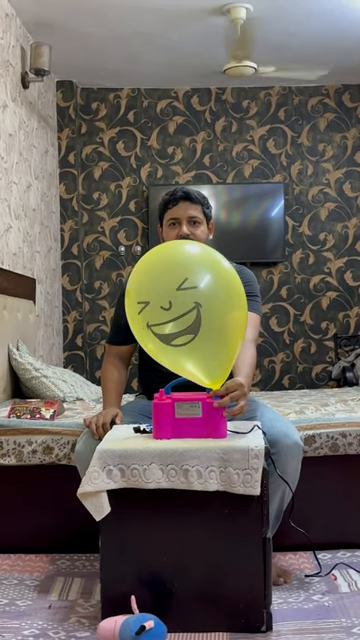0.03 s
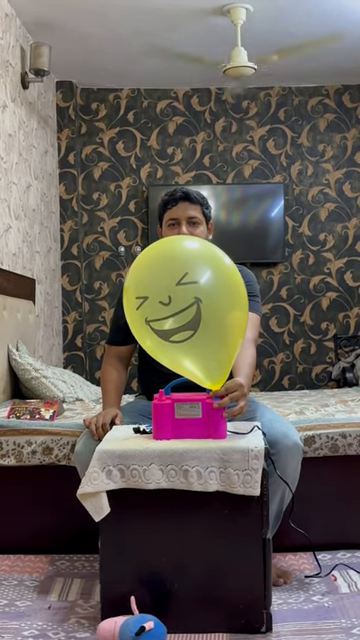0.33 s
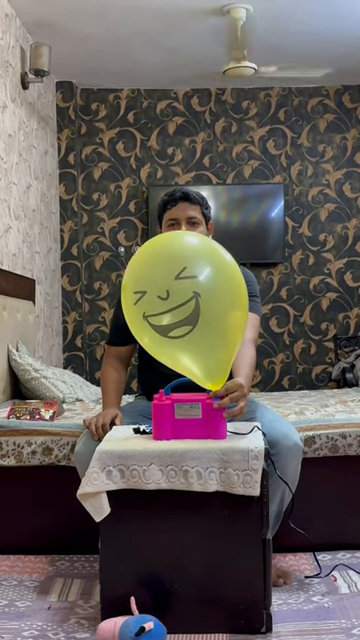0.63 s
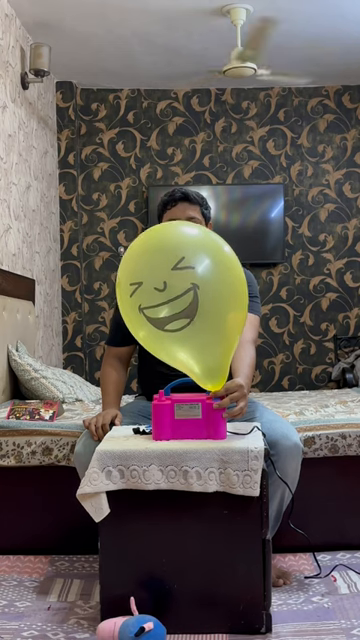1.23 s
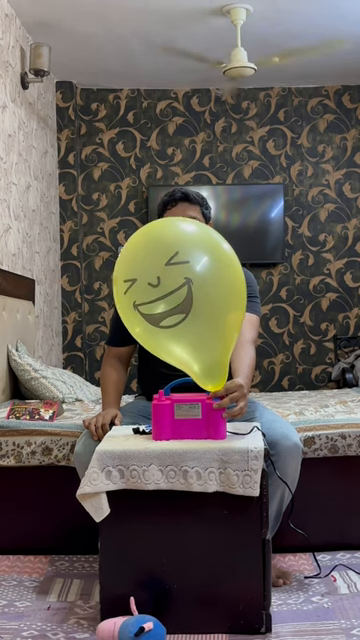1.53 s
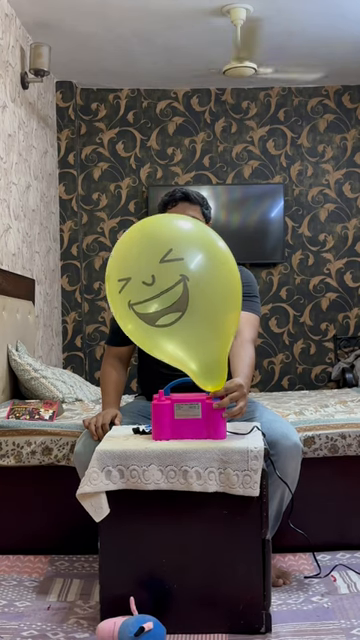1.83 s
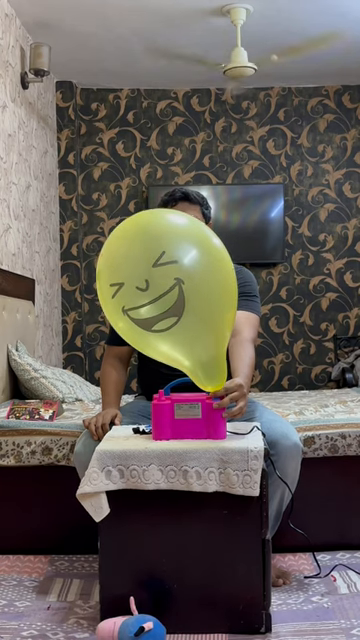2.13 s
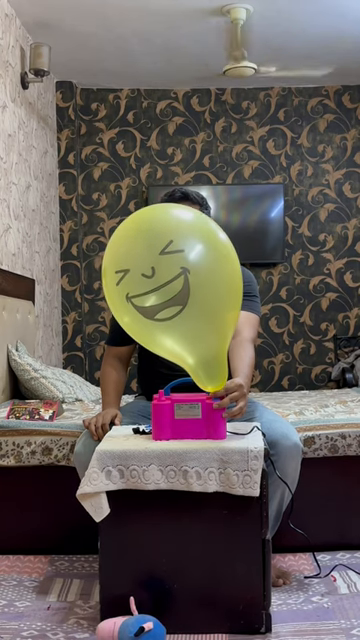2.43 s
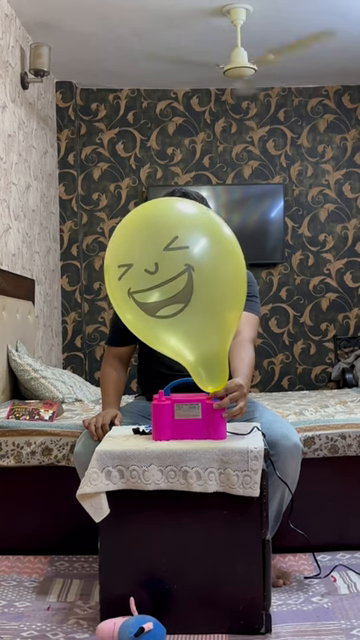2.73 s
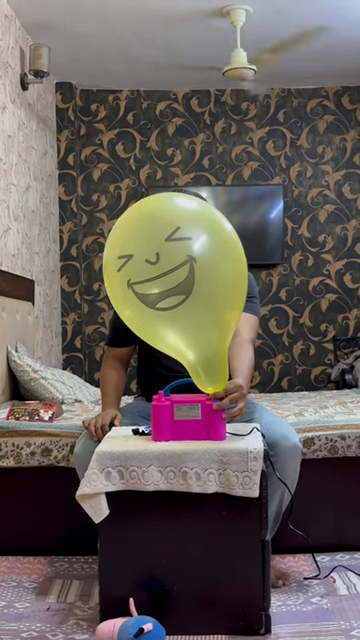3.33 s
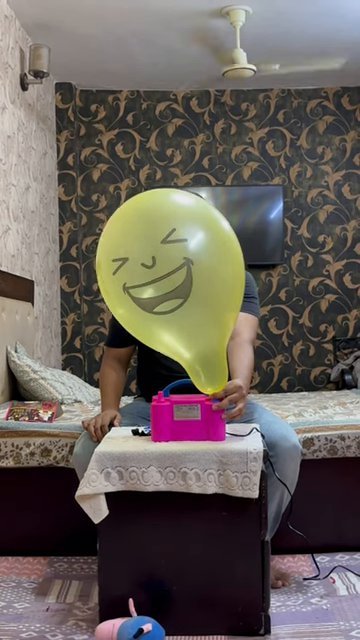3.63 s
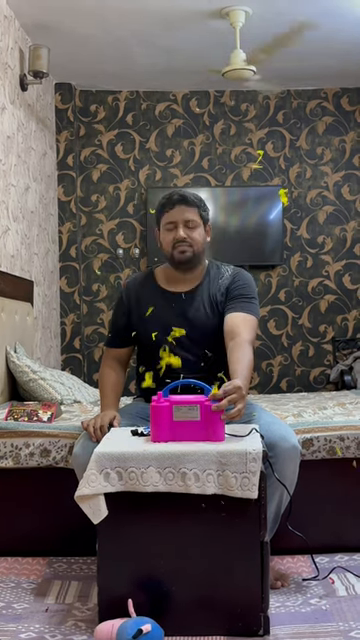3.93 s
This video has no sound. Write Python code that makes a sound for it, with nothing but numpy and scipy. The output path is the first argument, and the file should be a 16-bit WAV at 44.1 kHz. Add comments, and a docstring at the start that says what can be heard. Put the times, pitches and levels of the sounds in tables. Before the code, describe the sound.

An electric balloon pump runs from the start with a steady motor whine, a hiss of air and a thin, high whistle that keeps swelling and fading. At about 3.8 seconds the balloon bursts with one sharp bang, far louder than the pump. The small room booms briefly, and the pump carries on underneath, much quieter after the bang.

```python
"""In a small furnished room, an electric balloon pump runs on a table: its motor whines,
air rushes through it and the nozzle gives a wavering whistle. Near the end the overfilled
balloon rips and bursts. The walls throw the bang back and the room booms. The phone's
limiter, an automatic volume control, turns the pump down along with the bang."""
import sys
import numpy as np
from scipy import signal
from scipy.fft import rfft, irfft
from scipy.io import wavfile
from scipy.ndimage import uniform_filter1d, minimum_filter1d

SR = 44100
rng = np.random.default_rng(int(sys.argv[2]) if len(sys.argv) > 2 else 0)


def materialize(psi):
    """Save the field psi as 16-bit PCM at rate SR to the path in sys.argv[1].

    A 1-D psi becomes a single channel; in a 2-D psi each row is a channel.
    """
    bounded = np.clip(np.atleast_2d(psi).T, -1, 1)
    quanta = np.round(bounded * 32767).astype(np.int16)
    wavfile.write(sys.argv[1], SR, quanta)


N = 176400

BURST_S = 3.7852
# Left-right differences of the sound. From 10.6 to 13.3 kHz the sides are set opposite,
# so that treble vanishes from the centre.
# Columns: pitch_hz, left_lead_rad, left_minus_right_db, likeness (0 to 1)
SIDE_DIFFERENCES = [(100, 0, .8, .99), (250, 0, 3.5, .95), (480, 0, 6, .72), (750, -.6, 4, .66),
                    (1200, -.15, 0, .75), (1700, 0, 0, .98), (5400, 0, 0, .98), (6100, -.65, 0, .88),
                    (8000, -1.6, 0, .75), (9800, -2.5, 0, .8), (10600, -3.13, 0, .999),
                    (13300, -3.15, 0, .999), (14300, -3.4, 0, .75), (15500, -4.3, 0, .75)]


def burst(t):
    """The rubber parts with two cracks and snaps; the freed air thumps and rings, falling in pitch."""
    # The rubber giving way. Columns: start_s, crack_db, snap_db
    breaks = [(3.7851, 9.5, 5), (3.787, -3, 1.5)]
    crack_s, snap_fade_s = 0.00049, 0.0011
    cracks = 0
    for start, crack_db, snap_db in breaks:
        age = np.maximum(t - start, 0)
        crack = undb(crack_db) * (1 - 2 * age / crack_s) * (age < crack_s)  # shaped like the letter N
        snap = undb(snap_db) * np.exp(-age / snap_fade_s) * rng.standard_normal(N)
        cracks = cracks + (t >= start) * (crack + snap)
    age = np.maximum(t - BURST_S, 0)
    start_hz, end_hz, glide_s, ring_s = 1760, 463, 0.00076, 0.0059
    cycles = end_hz * age + (start_hz - end_hz) * glide_s * (1 - np.exp(-age / glide_s))
    ring = -undb(8) * np.sin(2 * np.pi * cycles) / (1 + (age / ring_s) ** 6)
    thump = undb(0.5) * air_push(age, fade_s=0.0018)
    return irfft(to_sides(rfft(cracks + ring + thump)), N)


def rip(t):
    """A split races through the rubber, which flaps and hisses just before the bang."""
    # Tones of the flapping rubber. Columns: pitch_hz, peak_db
    flap_tones = [(570, -15.5), (310, -21)]
    peak_s, rise_s, fade_s = 3.7763, 0.003, 0.004
    age = t - peak_s
    from_peak = np.where(age < 0, age / rise_s, age / fade_s)
    swell = 1 / np.cosh(np.clip(from_peak, -50, 50)) ** 2
    flap = sum(undb(db) * np.cos(2 * np.pi * hz * age) for hz, db in flap_tones)
    treble_cut = signal.butter(6, 7500, fs=SR, output="sos")
    hiss = unit(signal.sosfilt(treble_cut, rng.standard_normal(N)))
    return swell * (pan(13) * flap + undb(-23) * hiss)


def nozzle_whistle(t):
    """Air whistles in the nozzle on a nearly steady pitch, and weakens as the balloon gives way."""
    # How the whistle swells and fades. Columns: time_s, level_db
    swells = [(0.0, -27), (0.08, -39), (0.2, -31), (0.265, -39.5), (0.345, -26.5), (0.41, -34),
              (0.5, -25.5), (0.71, -31.5), (0.732, -46), (0.765, -33), (0.8, -29), (0.835, -35),
              (0.88, -29.5), (0.98, -35.5), (1.14, -26.5), (1.18, -30), (1.24, -42), (1.34, -33),
              (1.43, -26.5), (1.49, -33), (1.52, -67), (1.565, -32), (1.61, -42), (1.67, -29.5),
              (1.77, -33.5), (1.81, -27.5), (1.85, -25.5), (1.92, -38.5), (2.0, -26.5), (2.15, -33),
              (2.18, -36.5), (2.23, -31), (2.3, -26), (2.34, -29), (2.38, -39.5), (2.47, -27),
              (2.62, -38.5), (2.68, -30.5), (2.74, -34.5), (2.79, -29.5), (2.85, -38), (2.89, -38),
              (2.91, -34.5), (3.01, -28), (3.09, -34), (3.13, -30), (3.21, -33), (3.245, -44), (3.29, -34),
              (3.44, -39.5), (3.57, -29.5), (3.61, -28.5), (3.64, -39), (3.72, -40), (3.75, -27.5),
              (3.77, -34)]
    pitch_hz, rise_hz_per_s, wander_hz, jitter_hz = 5091.5, 2, 3.42, 3.47
    drop_at_s, drop_takes_s, drop_db = 3.764, 0.006, 8
    hz = pitch_hz + rise_hz_per_s * t + wander_hz * wobble(40.1) + jitter_hz * wobble(300)
    db = np.interp(t, *np.array(swells).T) + 0.4 + 0.43 * wobble(90)
    db = db - drop_db * np.clip((t - drop_at_s) / drop_takes_s, 0, 1)
    return np.sqrt(2) * undb(db) * np.sin(2 * np.pi * np.cumsum(hz) / SR)


def motor_whine(t):
    """The spinning shaft makes one tone with faint higher ones; the room shifts the lowest leftward."""
    # The motor's tones. Columns: multiple (of the shaft's rate), level_db
    tones = [(1, -34.5), (2, -61), (3, -57.5), (7, -55.5), (12, -56.5)]
    shaft_hz, flutter_db, rise_db_per_s = 646.8, 0.4, 0.17
    angle = 2 * np.pi * np.cumsum(shaft_hz * (1 + 0.00034 * wobble(11.55))) / SR
    whine = 0
    for multiple, db in tones:
        left_lag_rad, sides = (1.42, pan(7)) if multiple == 1 else (0, 1)
        level = np.sqrt(2) * undb(db + flutter_db * wobble(30))
        whine = whine + sides * level * np.sin(multiple * angle - np.array([[left_lag_rad], [0]]))
    return whine * undb(rise_db_per_s * (t - t.mean()))


def rushing_air(t):
    """Swirling air hisses and makes the parts ring, a little louder as the balloon pushes back."""
    # The tone colour of the rush. Columns: pitch_hz, relative_db
    colour = [(25, -93), (55, -79.5), (90, -75.5), (160, -84.5), (225, -82.5), (310, -79.5), (400, -79),
              (480, -74), (850, -72.5), (1250, -73), (1600, -75.5), (2200, -74.5), (3800, -75.5),
              (5550, -77), (7000, -73.5), (9300, -71.5), (10800, -79.5), (12000, -93.5), (14500, -71),
              (16000, -84)]
    # Where the housing, balloon and nozzle ring. Columns: pitch_hz, width_hz, level_db
    resonances = [(55.5, 6.9, -65.5), (793, 25, -54.5), (870, 12, -62), (905, 14, -56), (943, 14, -60),
                  (1125, 16, -63), (1182, 9.8, -61), (1842, 25, -55.5), (2060, 60, -57), (2436, 40, -55.5),
                  (2780, 31, -59.5), (3046, 18, -63), (3870, 14, -61.5), (4290, 27, -57), (4560, 50, -59.5),
                  (5084, 80, -41.5), (6040, 55, -48.5), (6110, 170, -49.5), (6400, 57, -52.5),
                  (6540, 30, -59.5), (14524, 70, -56)]
    rush_db, flicker_db, rise_db_per_s = -33.5, 0.61, 0.47
    level = undb(rush_db + flicker_db * wobble(60))
    rush = level * unit(irfft(wide_noise() * close_reflections() * undb(spectrum(colour)), N))
    bin_hz = np.arange(N // 2 + 1) * SR / N
    peaks = sum(undb(db) * unit(1 / (1 + (1.56 * (bin_hz - hz) / width) ** 2))
                for hz, width, db in resonances)
    ringing = irfft(wide_noise() * peaks, N)
    return (rush + ringing) * undb(rise_db_per_s * (t - t.mean()))


def wall_slaps(t):
    """Ceiling and walls throw the bang back as separate dull thuds, each with a trace of the snap."""
    # The first echoes. Columns: start_s, thud_db, snap_db
    echoes = [(3.8013, 4, -13), (3.803, 7, -19), (3.8094, 1.5, -4), (3.8184, 4, -15), (3.8296, 8, -9),
              (3.8365, 4, -16)]
    snap_fade_s = 0.0011
    slaps = 0
    for start, thud_db, snap_db in echoes:
        age = np.maximum(t - start, 0)
        thud = -undb(thud_db) * air_push(age, fade_s=0.00072)
        snap = undb(snap_db) * (t >= start) * np.exp(-age / snap_fade_s) * rng.standard_normal(N)
        slaps = slaps + thud + snap
    return irfft(to_sides(rfft(slaps)), N)


def room_boom(t):
    """Countless echoes of the bang blend, hold briefly and die away, each pitch at its own speed."""
    # How the room rings. Columns: pitch_hz, relative_db, fade_s (time to fall by 60 dB)
    bands = [(25, -60, .18), (52, -44, 0.3), (85, -44, .29), (130, -45.5, 0.37), (174, -48.5, 0.38),
             (240, -40.5, 0.37), (298, -49.5, 0.45), (423, -40, 0.4), (600, -47.5, 0.47), (840, -51, 0.52),
             (1730, -61, 0.44), (2500, -61.5, 0.49), (4330, -70.5, 0.52), (8350, -62.5, 0.42),
             (12000, -76, 0.37), (16000, -69, 0.23)]
    delay_s, rise_s, hold_s = 0.014, 0.0036, 0.02
    age = t - BURST_S - delay_s
    echoes = wide_noise() * undb(spectrum(bands))
    echoes = echoes / np.std(irfft(echoes, N))
    boom = 0
    for hz, _, fade_s in bands:
        this_band = spectrum([(row[0], row[0] == hz) for row in bands])
        fade = undb(-60 * np.maximum(age - hold_s, 0) / fade_s)
        boom = boom + irfft(echoes * this_band, N) * fade
    early, late = np.clip(np.array([t - BURST_S, age]) / rise_s, 0, 1)
    return undb(1.27) * boom * np.maximum(late, undb(-12) * early)


def housing_hum(t):
    """The pump's housing hums on three fluttering tones; the lowest swells and fades."""
    # The two upper tones. Columns: pitch_hz, level_db, left_minus_right_db
    upper_tones = [(246.5, -58, 4), (1400, -59, -1.5)]
    # Loudness of the lowest tone. Columns: time_s, level_db
    low_swells = [(0.0, -66), (0.15, -54.5), (0.55, -61), (0.8, -59.5), (1.35, -55.5), (2.15, -62),
                  (2.35, -53.5), (2.55, -57), (2.8, -47.5), (2.95, -60), (3.4, -53.5), (3.75, -56.5)]
    low_tone = (200, np.interp(t, *np.array(low_swells).T), 2.5)
    hum = 0
    for hz, db, side_db in upper_tones + [low_tone]:
        level = np.sqrt(2) * undb(db + 2 * wobble(8.75))
        hum = hum + pan(side_db) * level * np.sin(2 * np.pi * hz * t + 0.1 * wobble(6.4))
    return hum


def close_reflections(depth_db=1.5, width_hz=22):
    """Echoes from close by make some narrow bands of pitch louder and others softer."""
    span = int(width_hz * N / SR)
    bumps = uniform_filter1d(uniform_filter1d(rng.standard_normal(N // 2 + 1), span), span)
    return undb(depth_db * unit(bumps))


def wide_noise():
    """The spectrum of an even hiss that is only partly alike on the left and right."""
    shared, apart = rfft(rng.standard_normal((2, N)))
    alike = np.clip(spectrum(SIDE_DIFFERENCES, column=3), 0, 1)
    opposite = apart * np.array([[1], [-1]])
    return to_sides(np.sqrt((1 + alike) / 2) * shared + np.sqrt((1 - alike) / 2) * opposite)


def to_sides(bins):
    """Give each pitch in a spectrum its own level and timing on the left and right."""
    sides = np.array([[1], [-1]]) / 2
    level = undb(sides * spectrum(SIDE_DIFFERENCES, column=2))
    return bins * level * np.exp(1j * sides * spectrum(SIDE_DIFFERENCES, column=1))


def air_push(age, fade_s):
    """One push of air followed by a weaker pull."""
    progress = age / fade_s
    return progress * (2 - progress) * np.exp(-progress)


def spectrum(table, column=1):
    """Spread one column of a table smoothly over all pitches."""
    rows = np.array(table, float)
    bin_hz = np.arange(N // 2 + 1) * SR / N
    return np.interp(np.log(bin_hz + 1e-3), np.log(rows[:, 0]), rows[:, column])


def wobble(rate_hz):
    """A smooth random drift of typical size 1, with rate_hz new values a second."""
    span = max(int(SR / rate_hz), 1)
    steps = np.repeat(rng.standard_normal(N // span + 1), span)
    return unit(uniform_filter1d(uniform_filter1d(steps, span), span)[:N])


def pan(db):
    """Left and right gains that make the left side louder by db."""
    return undb(np.array([[db], [-db]]) / 2)


def undb(db):
    """Turn decibels into a gain to multiply by."""
    return 10 ** (np.asarray(db) / 20)


def unit(x):
    """Scale a signal to a typical size (rms) of 1."""
    return x / np.sqrt(np.mean(x ** 2))


def scene():
    """The pump runs throughout; the balloon bursts near the end."""
    t = np.arange(N) / SR
    pump = motor_whine(t) + housing_hum(t) + nozzle_whistle(t) + rushing_air(t)
    return pump + rip(t) + burst(t) + wall_slaps(t) + room_boom(t)


def record(dry):
    """The bang overloads the microphone; a limiter turns the volume down, then slowly back up."""
    overload_db, ceiling_db, recovery_db_per_s, look_ahead_s = 12, -5, 5.5, 0.0017
    squashed = undb(overload_db) * np.tanh(dry / undb(overload_db))
    peak_db = 20 * np.log10(np.abs(squashed).max(axis=0) + 1e-9)
    needed_db = np.minimum(ceiling_db - peak_db, 0)
    recovery_db = recovery_db_per_s * np.arange(N) / SR
    held_db = np.minimum.accumulate(needed_db - recovery_db) + recovery_db
    span = 2 * int(look_ahead_s * SR / 2) + 1
    gain = undb(uniform_filter1d(minimum_filter1d(held_db, span), span))  # dips just ahead of a peak
    rumble_cut = signal.butter(3, 22, "highpass", fs=SR, output="sos")
    treble_cut = signal.ellip(10, .2, 80, 15800, fs=SR, output="sos")
    return signal.sosfilt(treble_cut, signal.sosfilt(rumble_cut, squashed * gain))


dry = scene()
out = record(dry)
materialize(out)
```